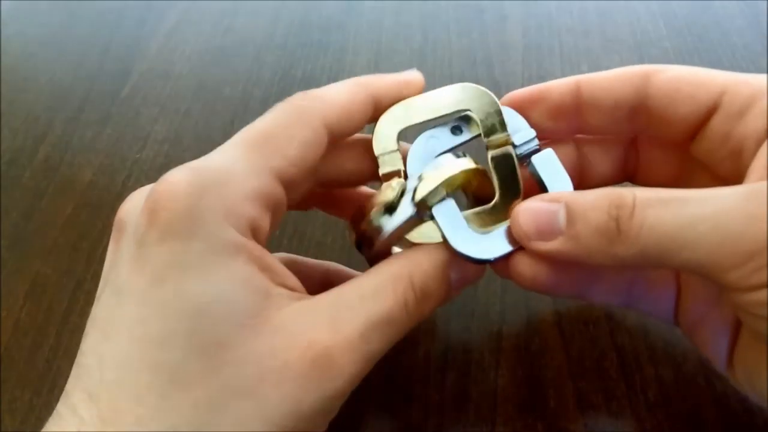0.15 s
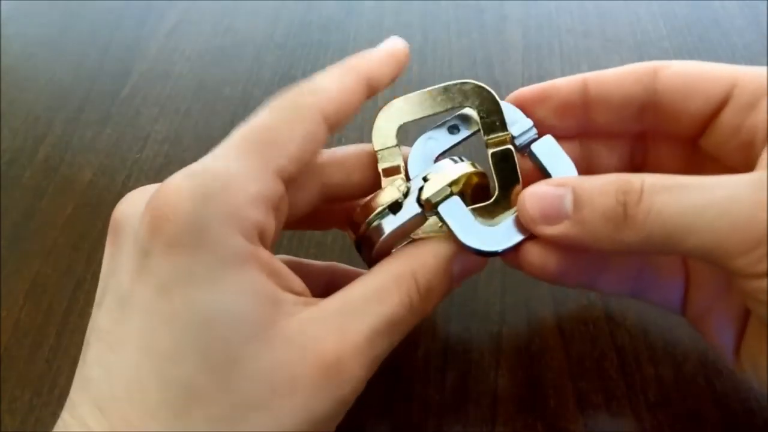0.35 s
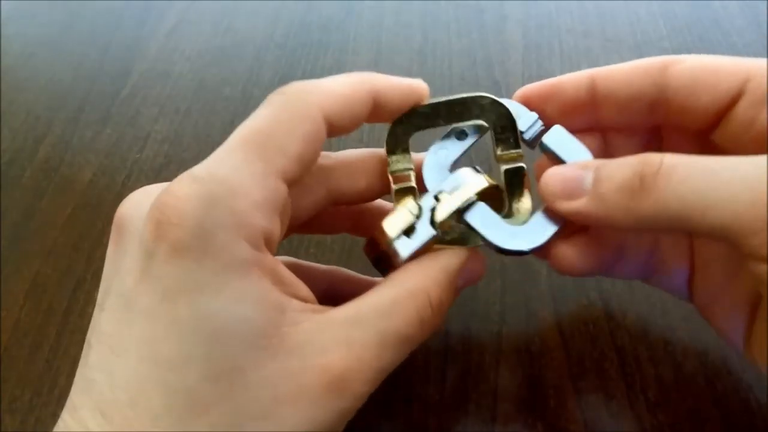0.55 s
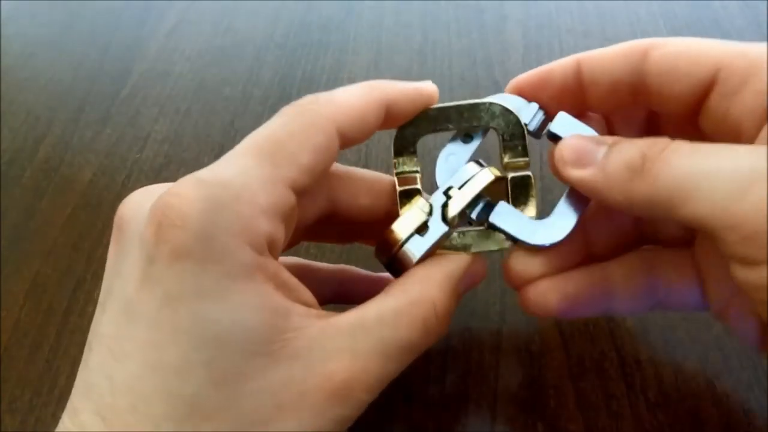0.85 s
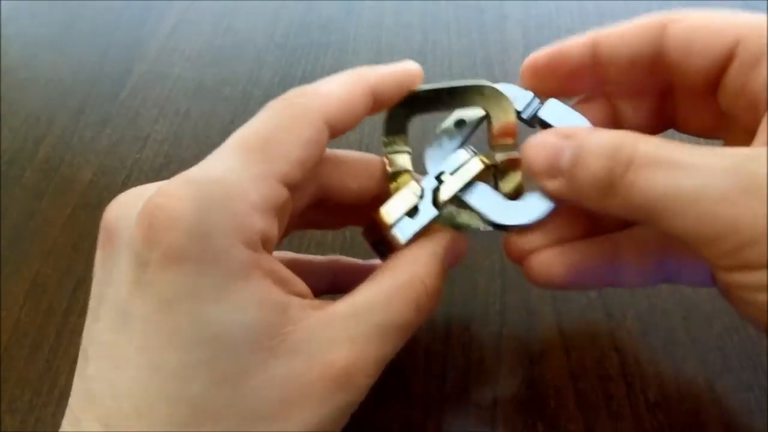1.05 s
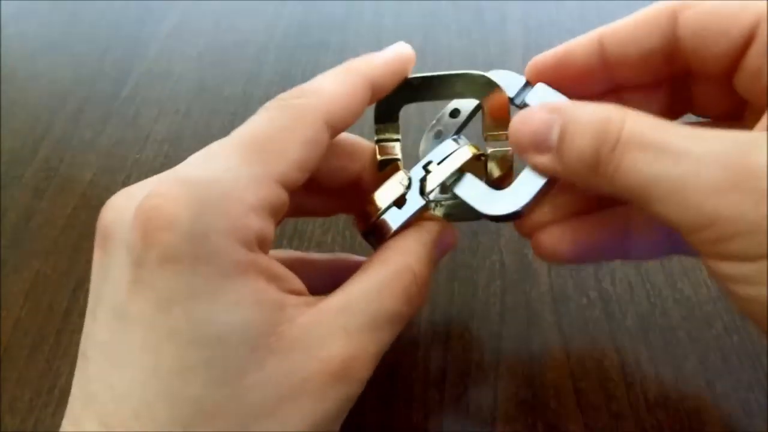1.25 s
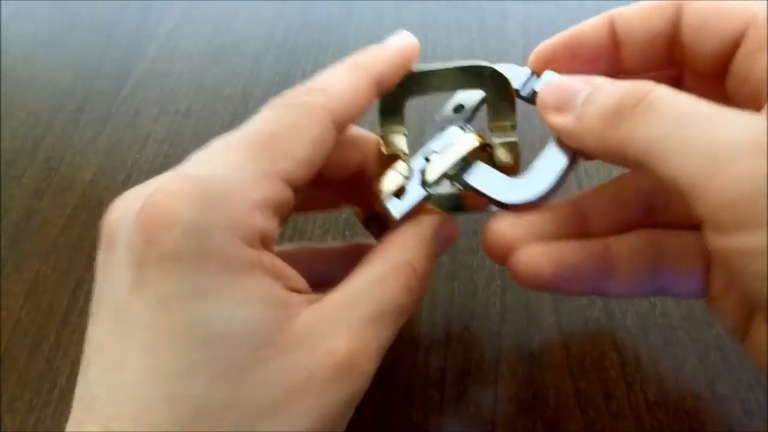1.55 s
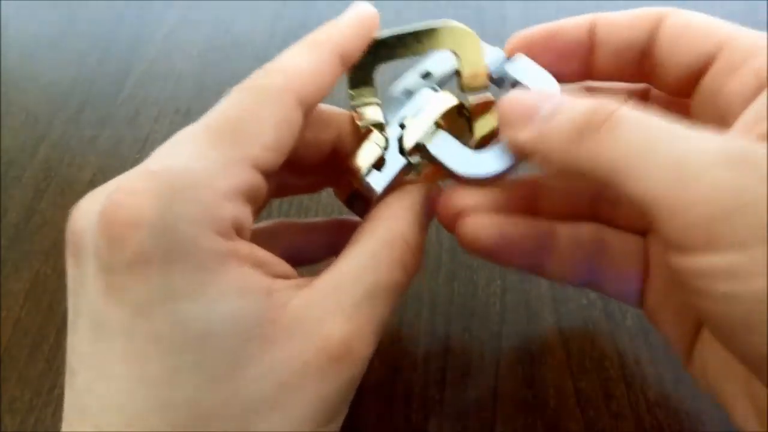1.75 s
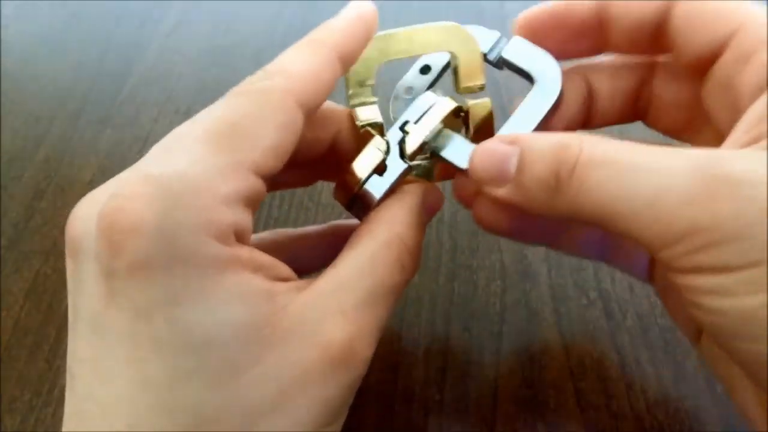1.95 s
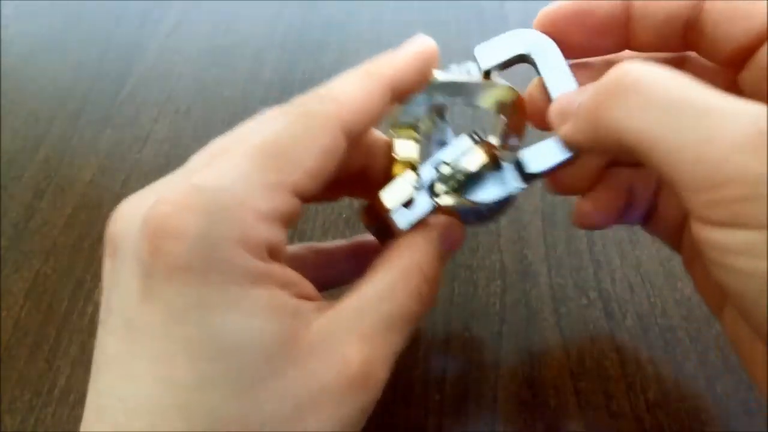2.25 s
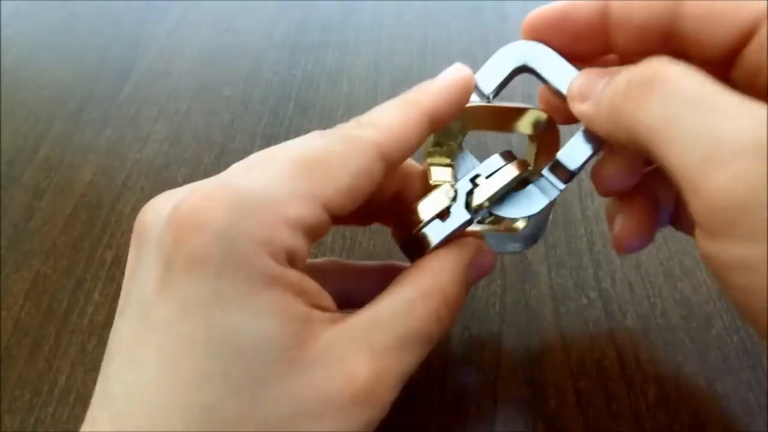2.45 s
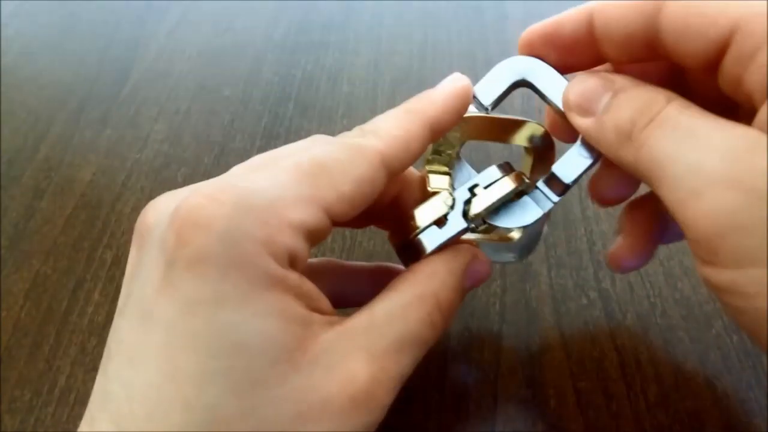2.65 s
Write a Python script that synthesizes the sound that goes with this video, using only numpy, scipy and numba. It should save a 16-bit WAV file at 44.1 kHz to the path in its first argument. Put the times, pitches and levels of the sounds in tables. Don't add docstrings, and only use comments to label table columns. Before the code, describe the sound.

A metal puzzle is handled close to a phone in a small room, over a faint low fridge hum and the fading tail of earlier handling. Bright knocks and gritty slides cluster at 0.2-0.55 s, loudest near 0.27 and 0.47. A knock follows at 0.9, then sparse ticks at 1.08, 1.29, 1.41 and 1.54. A click at 2.05 leads to scraping from 2.23 and sharp ticks at 2.44 and 2.49, ending with a faint knock at 2.7.

```python
import sys
import numpy as np
from scipy import signal
from scipy.fft import rfft, irfft, next_fast_len
from scipy.io import wavfile
from scipy.ndimage import uniform_filter1d
from numba import njit

SR = 44100
rng = np.random.default_rng(int(sys.argv[2]) if len(sys.argv) > 2 else 0)


def gain_from_db(level_db):
    decades = np.asarray(level_db, float) / 20
    return 10 ** decades


def transcribe(signal):
    frames = np.atleast_2d(signal).T
    limited = np.clip(frames, -1, 1)
    pcm = np.round(limited * 32767).astype(np.int16)
    wavfile.write(sys.argv[1], SR, pcm)


N = 123479

# [f/Hz, level/dB, t60/s]
RINGS = [(6620, -2.5, 0.11), (8100, -12.5, .15), (8100, -13, 0.27), (8020, -16, 0.43), (8062, 3.5, 0.11),
         (9680, 2.5, 0.13), (9940, -5, 0.087), (9810, -3, 0.68), (10700, -2, .2), (11030, -3, 0.063)]
GRIP_DB = 4


def unit(x):
    return x / np.sqrt(np.mean(x ** 2))


def shape(x, gain):
    n = x.shape[-1]
    size = next_fast_len(n + 8192)
    f = np.arange(size // 2 + 1) * SR / size + 1e-3
    return irfft(rfft(x, size) * gain(f), size)[..., :n]


def peaks(table):
    def gain(f):
        return sum((-1) ** k * gain_from_db(db) / (1 + 1j * (f - hz ** 2 / f) / width_hz)
                   for k, (hz, width_hz, db) in enumerate(table))
    return gain


def walk(rate_hz):
    k = int(SR / rate_hz)
    steps = np.repeat(rng.standard_normal(N // k + 1), k)
    return unit(uniform_filter1d(uniform_filter1d(steps, k), k)[:N])


@njit
def follow(x, up, down):
    y, e = np.empty(len(x)), x[:2000].mean()
    for i in range(len(x)):
        e += (x[i] - e) * (up if x[i] > e else down)
        y[i] = e
    return y


def fridge():
    # [multiple of motor_hz, level/dB]
    hum_lines = [(1, -61), (2, -61), (3, -63.5), (4, -62), (5, -69.5), (6, -77), (7, -66), (8, -81.5),
                 (9, -80.5), (11, -78.5)]
    motor_hz, wander_db, pan_db, lag_s = 48.85, 1.3, 4, -0.00034
    t = np.arange(N) / SR - np.array([[lag_s], [0]])
    hum = 0
    for k, db in hum_lines:
        wander = walk(16) + 1.1 * np.array([walk(12), walk(11)])
        tone = np.sin(2 * np.pi * (k * motor_hz * t + rng.random()))
        hum = hum + gain_from_db(db + 1.5 + wander_db * wander) * tone
    return hum * gain_from_db(np.array([[pan_db], [-pan_db]]) / 2)


def air():
    # [f/Hz, density/dB]
    air_colour = [(15, -31.5), (25, -2), (195, -4), (344, -8), (394, -14.5), (2690, -22.5), (5570, -24),
                  (8360, -9), (16000, -27.5)]
    air_db, alike_hz = -58.5, 500
    hz, db = np.array(air_colour).T
    colour = lambda f: gain_from_db(np.interp(np.log(f), np.log(hz), db))
    mid = shape(rng.standard_normal(N), colour)
    side = shape(rng.standard_normal(N), lambda f: colour(f) * f / (f + alike_hz))
    return gain_from_db(air_db) * unit(mid + side * np.array([[1], [-1]]))


def ports(x):
    # [f/Hz, width/Hz, level/dB]
    left_port = [(6670, 1530, -7.5), (8035, 640, 1.5), (10060, 990, 4), (11680, 580, -8),
                 (13720, 2200, -39.5)]
    right_port = [(7500, 210, -13.5), (8000, 700, 2.5), (10900, 1500, -12.5), (13120, 12000, -32.5)]
    return np.array([shape(x[0], peaks(left_port)), shape(x[1], peaks(right_port))])


def body_modes(x):
    # [f/Hz, width/Hz, level/dB]
    modes = [(880, 380, -11), (1580, 690, -9.5), (2850, 293, 4), (3830, 1170, 0), (5140, 730, 4.5)]
    return shape(x, peaks(modes))


def earlier_tail():
    tail_db, t60_s = -29.5, 0.42
    hush = rng.standard_normal((2, N))
    coloured = ports(hush) + gain_from_db(-18.0) * body_modes(hush)
    return coloured * gain_from_db(tail_db - 60 * np.arange(N) / SR / t60_s)


def strikes(table, rise_s, hold_s):
    fall_s, rough_db, chatter_db, crack_db, crack_s = 0.0022, 1, -7.5, 12.5, 0.00083
    ring_level_db, scatter_db, near_hz = -33, 3, 1500
    own_width_hz, own_ring_db = 500, -14.5
    body_level_db, ping_level_db, ping_t60_s = 9.5, -0.5, .014
    port_like = 0.67
    out, t = np.zeros((6, N + SR)), np.arange(SR // 6) / SR
    ring_hz, ring_db, t60_s = np.array(RINGS).T[:, :, None]
    chance = rng.standard_normal((len(table), 6, len(RINGS), 1))
    grit = rng.standard_normal((len(table), 3, len(t)))
    onset = np.clip(t / rise_s, 0, 1)
    env = onset * np.exp(-np.clip(t - hold_s, 0, 1) / fall_s)
    energy = np.sum(env ** 2)
    for (s, db, hz, body_db, ping_hz), c, g in zip(table, chance, grit):
        bumpy = env * gain_from_db(rough_db * unit(uniform_filter1d(g[2], size=40)))
        bumpy = bumpy * np.sqrt(energy / np.sum((bumpy * g[0]) ** 2))

        own = signal.lfilter(*signal.iirpeak(hz, hz / own_width_hz, fs=SR), bumpy * g[0])
        own = gain_from_db(own_ring_db) * own * np.sqrt(energy / np.sum(own ** 2))
        near_db = ring_level_db + ring_db + scatter_db * c[0]
        near_db = near_db - 6 * np.abs(ring_hz - hz) / near_hz - 60 * t / t60_s
        phase = 2 * np.pi * ring_hz * (1 + .003 * c[1]) * t
        rings = []
        for k in (0, 1):
            modes = gain_from_db(near_db + scatter_db * c[2 + k]) * np.sin(phase + 2 * np.pi * c[4 + k])
            rings.append(onset * (own + modes.sum(axis=0)))

        bumpy = bumpy * gain_from_db(chatter_db) * (1 + gain_from_db(crack_db) * np.exp(-t / crack_s))
        other = port_like * g[0] + np.sqrt(1 - port_like ** 2) * g[1]
        ping = onset * gain_from_db(ping_level_db - 60 * t / ping_t60_s) * np.sin(2 * np.pi * ping_hz * t)
        body = gain_from_db(body_db + body_level_db)
        rows = [bumpy * g[0], gain_from_db(-0.5) * bumpy * other, *rings, body * bumpy * g[0], body * ping]
        i = int((s - rise_s / 2) * SR)
        out[:, i:i + len(t)] += gain_from_db(db) * np.array(rows)
    return out[:, :N]


def knocks():
    # [t/s, level/dB, strongest ring f/Hz, body re treble/dB, body ping f/Hz]
    rolling = [(0.1838, -25, 10400, -22.5, 2860), (0.2704, -5.5, 7920, -28, 5400),
               (0.2862, -16, 7600, -10, 5200), (0.3382, -17, 10100, -17.5, 5230),
               (0.349, -14, 10200, -46, 4630), (0.4707, -4.5, 10040, -30, 4960),
               (0.4908, -15.5, 7800, -22, 5000), (0.5439, -31.5, 10700, -16, 5040),
               (0.6516, -33, 9800, -19.5, 2900), (0.9097, -11.5, 8420, -18, 5060),
               (2.3572, -21, 9540, -22.5, 4900), (2.6987, -29, 7760, -17.5, 3750)]
    return strikes(rolling, rise_s=0.0012, hold_s=0.0067)


def slides():
    # [t/s, length/s, level/dB, body/dB, upper re lower rings/dB]
    strokes = [(0.218, 0.047, -24.5, -1.5, 2.5), (0.282, 0.03, -21, -9.5, -3.5),
               (0.322, 0.022, -28.5, -5, -6), (0.347, 0.022, -22.5, -7.5, 1), (0.374, .04, -31.5, -3.5, 9),
               (0.486, 0.036, -25.5, -8.5, -0.5), (0.544, 0.018, -33, -6, 0.5),
               (0.639, 0.035, -43.5, -1.5, -3.5), (0.905, 0.06, -38, -3.5, 6),
               (1.401, 0.0033, -39.5, -6.5, 3), (1.406, .025, -36.5, -12.5, -9.5),
               (1.551, 0.012, -29, -8, -2.5), (1.988, 0.053, -50, -5.5, -4.5),
               (2.061, 0.0245, -40.5, -0.5, 1.5), (2.112, 0.025, -41, -8, -2),
               (2.228, .012, -36, -14.5, -2), (2.252, 0.02, -31, -11, -5),
               (2.286, 0.043, -26.5, -7.5, -2.5), (2.36, 0.016, -29, -4.5, -9),
               (2.394, 0.025, -34, -6.5, -3.5), (2.446, 0.03, -29.5, -2, -5.5),
               (2.5, 0.03, -30, -3.5, -7.5), (2.704, 0.011, -38.5, -7, -5)]
    grit_db, stutter_db, edge_s = 2.5, 2.5, 0.012
    rubbed_width_hz, ring_db, split_hz = 160, 7, 9000
    patch_db, patch_rate_hz = 3.5, 120
    t = np.arange(N) / SR
    clicks_db = grit_db * rng.exponential(size=N) + stutter_db * walk(250)
    grit = unit(rng.standard_normal(N) * gain_from_db(clicks_db))
    press = []
    for s, length_s, db, _, _ in strokes:
        inside_s = np.minimum(t - s + edge_s, s + length_s + edge_s - t)
        press.append(gain_from_db(db) * np.clip(inside_s / edge_s, 0, 1) ** 2)
    press = np.array(press)
    body_db, upper_db = np.array(strokes).T[3:]
    ringing = peaks([(hz, rubbed_width_hz, db / 2) for hz, db, _ in RINGS])
    comb = lambda f: 1 + gain_from_db(ring_db) * ringing(f)
    lower = shape(gain_from_db(-upper_db / 2) @ press * grit, lambda f: comb(f) * (f < split_hz))
    upper = shape(gain_from_db(upper_db / 2) @ press * grit, lambda f: comb(f) * (f >= split_hz))

    def patchy(x):
        out = 0
        for lo in 400 * 1.25 ** np.arange(18):
            band = shape(x, lambda f: (f >= lo) * (f < lo * 1.25))
            out = out + band * gain_from_db(patch_db * walk(patch_rate_hz))
        return out

    rub = patchy(lower + upper) * gain_from_db(-2.5)
    body = patchy(gain_from_db(body_db) @ press * grit) * gain_from_db(-1.5)
    return rub, body


def clinks():
    # [t/s, f/Hz, level/dB, held/s]
    link_clinks = [(0.2224, 10360, -25, 0.0044), (0.2365, 9440, -27, 0.0032), (0.2711, 10690, -21, 0.0047),
                   (0.2725, 8290, -10, 0.0055), (0.286, 8370, -21, 0.006), (0.3394, 10540, -18, 0.0029),
                   (0.3483, 10330, -15, 0.0031), (0.3655, 9950, -25, 0.002), (0.4713, 11510, -20, 0.0067),
                   (0.4715, 9960, -11, 0.007), (0.4729, 8100, -16, 0.0067), (0.4912, 8140, -20, 0.0105),
                   (0.5111, 7950, -25, 0.0029), (0.8544, 8230, -26, 0.0038), (0.8546, 10330, -31, 0.002),
                   (0.9109, 10440, -18, 0.0054), (0.9132, 7910, -16, 0.005), (0.9136, 9680, -20, 0.0025),
                   (0.9139, 11150, -21, 0.0023), (1.0793, 11350, -36, 0.0032), (1.0811, 8250, -25, 0.0035),
                   (1.2914, 8070, -41, 0.0036), (1.4131, 8200, -21, 0.0045), (1.4139, 9690, -19, 0.0037),
                   (1.5417, 10360, -27, 0.0039), (1.5423, 7810, -30, 0.0041), (1.9686, 8300, -38, 0.0041),
                   (2.0462, 6500, -31, 0.0041), (2.0462, 9590, -23, 0.003), (2.0464, 8090, -19, 0.0042),
                   (2.249, 8230, -28, 0.0136), (2.2634, 8230, -28, 0.0069), (2.2907, 7730, -30, 0.0063),
                   (2.2934, 6620, -33, 0.0114), (2.3606, 9680, -29, 0.0075), (2.4368, 8200, -22, 0.0031),
                   (2.4371, 10850, -20, 0.002), (2.4877, 6600, -20, 0.0107), (2.4879, 7730, -13, 0.0041),
                   (2.488, 9680, -14, 0.002), (2.4881, 8230, -11, 0.0039), (2.7, 8370, -37, 0.0071)]
    frame_clinks = [(0.221, 4830, -35, 0.0061), (0.235, 5330, -37, 0.0073), (0.2739, 5220, -29, 0.002),
                    (0.3508, 4810, -32, 0.003), (0.3657, 2940, -41, 0.0062), (0.4709, 4950, -34, 0.0086),
                    (0.4716, 2890, -37, 0.0056), (0.8538, 3140, -46, 0.0022), (0.9101, 2710, -38, 0.0029),
                    (0.9128, 4840, -34, 0.0079), (1.0787, 2530, -53, 0.0037), (1.0801, 5320, -38, 0.0026),
                    (1.5436, 3950, -48, 0.0023), (1.9749, 2850, -53, 0.0044), (2.0467, 2790, -38, 0.0029),
                    (2.3604, 5380, -33, 0.002), (2.4374, 4810, -35, 0.0035), (2.4881, 4760, -26, 0.0063)]
    # [f/Hz, level/dB]
    pan = [(2800, 9.5), (5000, 3.5), (6600, -3), (7700, -2), (8250, -7.5), (9000, 3.5), (9700, 20.5),
           (11500, 29)]
    rise_s, t60_s, beat_db, sag_db, level_db, lead_turns = .0008, 0.019, 1.46, 4, 1.5, 0.23
    events = [*link_clinks, *frame_clinks]
    t, out = np.arange(SR // 10) / SR, np.zeros((2, N + SR))
    pan_hz, pan_db = np.array(pan).T
    beat = gain_from_db(beat_db * walk(500))
    for (s, hz, db, held_s), c in zip(events, rng.standard_normal((len(events), 2))):
        turn = c[0] + np.array([[0], [lead_turns * (1 + c[1] / 2)]])
        left = gain_from_db(np.interp(np.log(hz), np.log(pan_hz), pan_db))
        gains = np.array([[left], [1]]) * np.sqrt(2 / (1 + left ** 2))
        sag = sag_db * np.clip(t / held_s, 0, 1)
        damping = 60 * np.clip(t - held_s, 0, 1) / t60_s
        env = np.clip(t / rise_s, 0, 1) * gain_from_db(db - sag - damping)
        i = int((s - rise_s / 2) * SR)
        out[:, i:i + len(t)] += env * gains * np.sin(2 * np.pi * (hz * t + turn))
    return out[:, :N] * beat * gain_from_db(level_db)


def free_rings():
    # [t/s, f/Hz, level/dB, t60/s]
    free = [
        (.472, 9940, -31.5, 0.13),
        (.472, 10350, -29, 0.13),
        (0.471, 8100, -30.5, 0.13),
        (0.471, 11550, -23.5, 0.072),
        (1.412, 9640, -23.5, 0.086),
        (2.488, 9670, -26, 0.2),
        (2.488, 10200, -28, 0.14),
        (2.488, 6620, -29, 0.12),
        (2.289, 6700, -34.5, 0.15),
        (2.486, 880, -49, 0.124),
    ]
    t, out = np.arange(N) / SR, 0
    for (s, hz, db, t60_s), turn in zip(free, rng.random((len(free), 2, 1))):
        decay = (t > s) * gain_from_db(db - 60 * np.abs(t - s) / t60_s)
        out = out + decay * np.sin(2 * np.pi * (hz * t + turn))
    return out * gain_from_db(GRIP_DB * walk(60))


def ticks():
    # [t/s, level/dB, strongest ring f/Hz, body re treble/dB, body ping f/Hz]
    sharp = [
        (0.853, -21.5, 8100, -22.5, 3160),
        (1.0786, -27.5, 8550, -21.5, 5560),
        (1.2904, -30.5, 8300, -29, 3240),
        (1.4126, -16.5, 9680, -40, 5040),
        (1.5405, -21, 10700, -17.5, 4060),
        (1.95, -34.5, 8250, -22, 4500),
        (1.9674, -32.5, 8400, -23.5, 2850),
        (2.0455, -14, 8200, -26.5, 2950),
        (2.4366, -12.5, 10900, -20, 4700),
        (2.4871, -5.5, 9430, -21.5, 4670),
    ]
    return strikes(sharp, rise_s=.0004, hold_s=0.00331)


def room(x):
    early_db, early_t60_s, late_db, late_t60_s, gap_s = -5.5, 0.16, -11, 0.63, 0.0044
    t = np.arange(SR) / SR
    tail = lambda db, t60_s: gain_from_db(db) * gain_from_db(-60 * t / t60_s) / np.sqrt(t60_s * SR / 15.2)
    decay = tail(early_db, early_t60_s) + tail(late_db, late_t60_s)
    answer = rng.standard_normal((2, SR)) * decay * (t > gap_s)
    return signal.fftconvolve(x, answer, axes=1)[:, :N]


def scene():
    port_lag_s, clink_wet_db = .0001, -11
    background = fridge() + air() + earlier_tail()
    hits = knocks() + ticks()
    rub, slide_body = slides()
    treble = hits[:2] + rub + hits[2:4] * gain_from_db(GRIP_DB * walk(90))
    body = body_modes(hits[4] + slide_body) + hits[5]
    direct = ports(treble) + body * gain_from_db(np.array([[0], [-4.]]))
    direct = direct + free_rings() * gain_from_db(np.array([[3.], [-5.]]))
    direct[1] = shape(direct[1], lambda f: np.exp(-2j * np.pi * f * port_lag_s))
    rung = clinks()
    to_room = shape(direct + gain_from_db(clink_wet_db) * rung, lambda f: gain_from_db(-5. * (f < 6000)))
    return direct + rung + room(to_room) + background


def low_pass(x):
    return signal.sosfilt(signal.butter(12, 16830, fs=SR, output="sos"), x)


def record(dry):
    open_db, slope, range_db = -45.5, 0.58, 16
    attack_s, release_s, bass_slew_s, bass_power = 0.066, 0.034, 0.057, 1.15
    ceiling, top_hz = .9, 16000
    heard = shape(dry, lambda f: f > 1000)
    bass = dry - heard
    level = follow(np.mean(heard ** 2, axis=0), 1 / (attack_s * SR), 1 / (release_s * SR))
    gain_db = np.clip(slope * (10 * np.log10(level + 1e-12) - open_db), -range_db, 0)
    gain = gain_from_db(gain_db)
    slow = follow(gain, 1 / (bass_slew_s * SR), 1 / (bass_slew_s * SR))
    mix = ceiling * np.tanh(heard * gain / ceiling) + bass * slow ** bass_power
    mix = shape(mix, lambda f: 1 / (1 + (f / top_hz) ** 90))
    return low_pass(mix)


dry = scene()
out = record(dry)
transcribe(out)
```